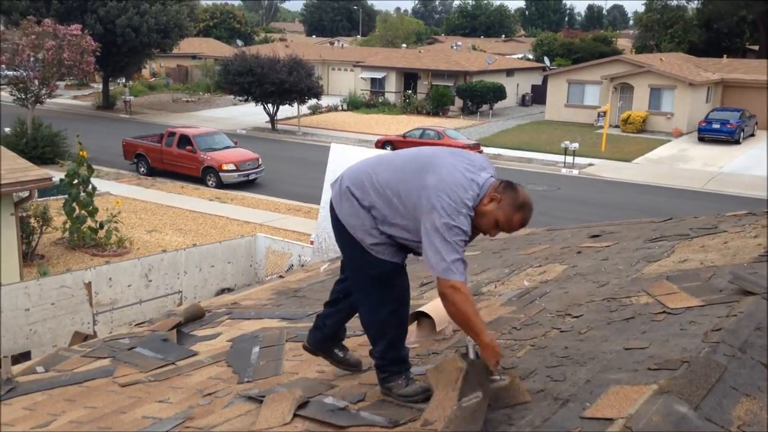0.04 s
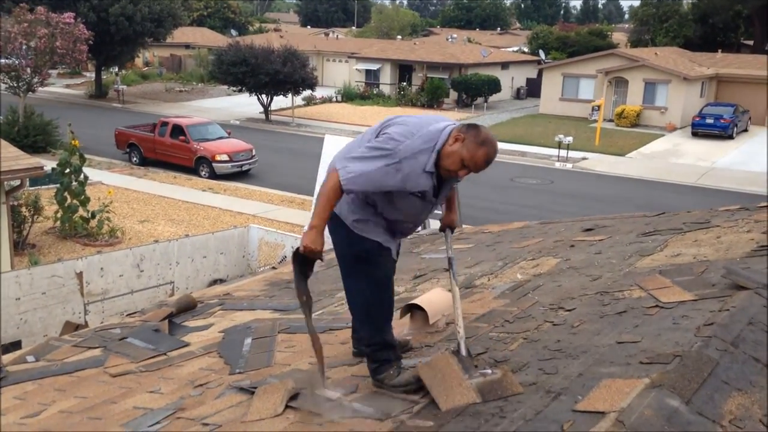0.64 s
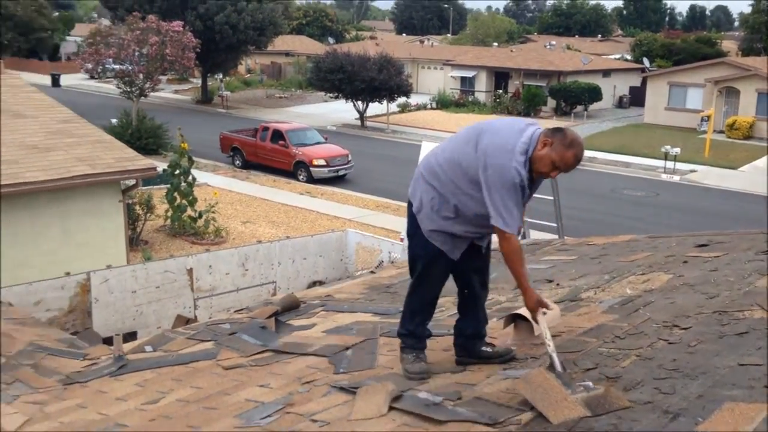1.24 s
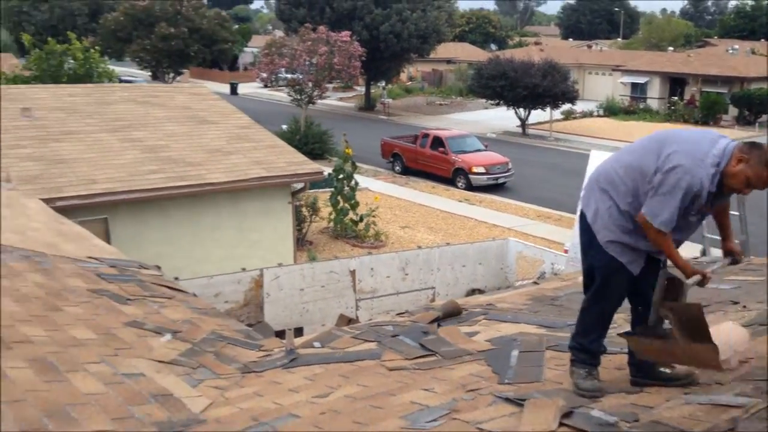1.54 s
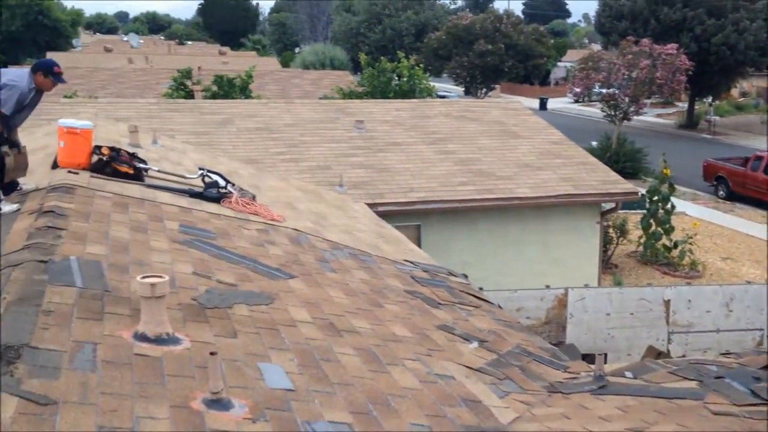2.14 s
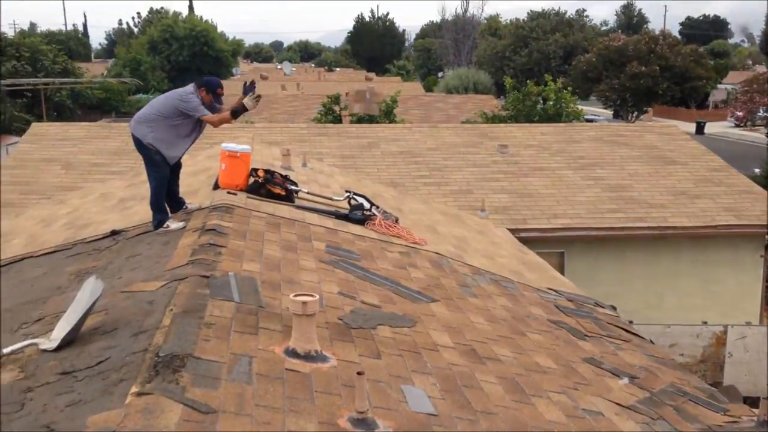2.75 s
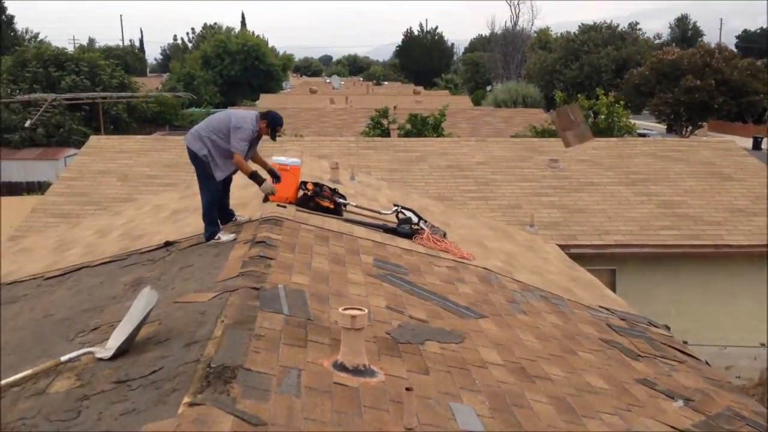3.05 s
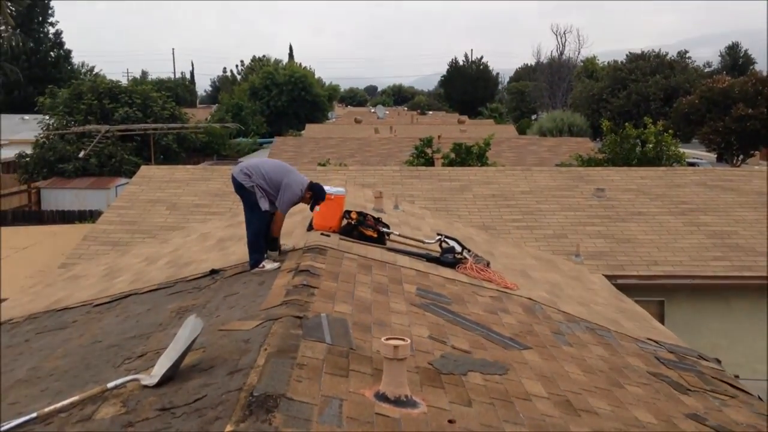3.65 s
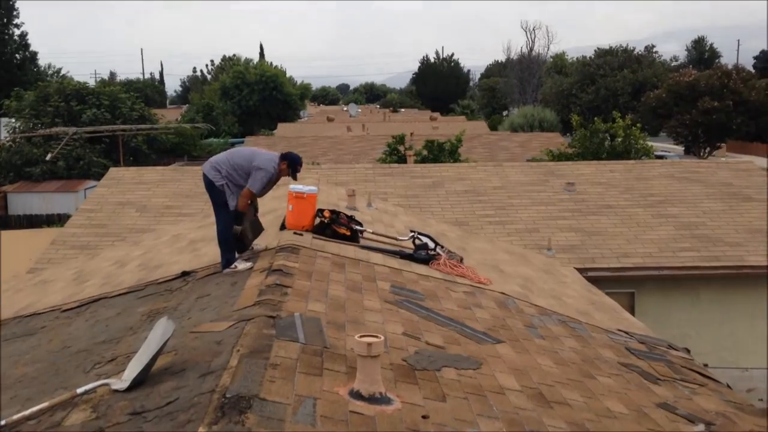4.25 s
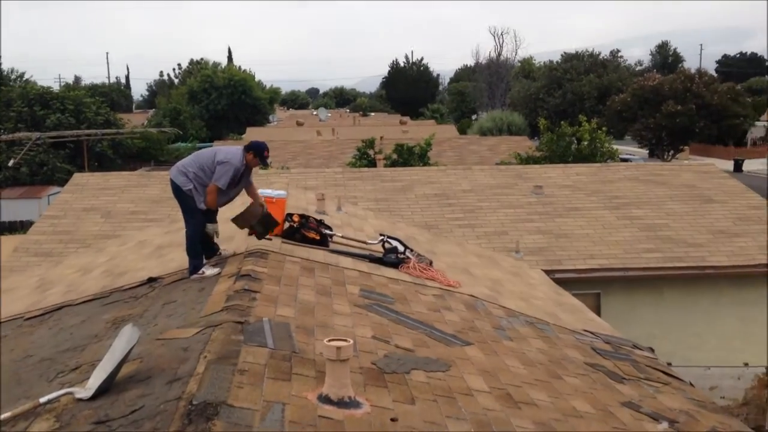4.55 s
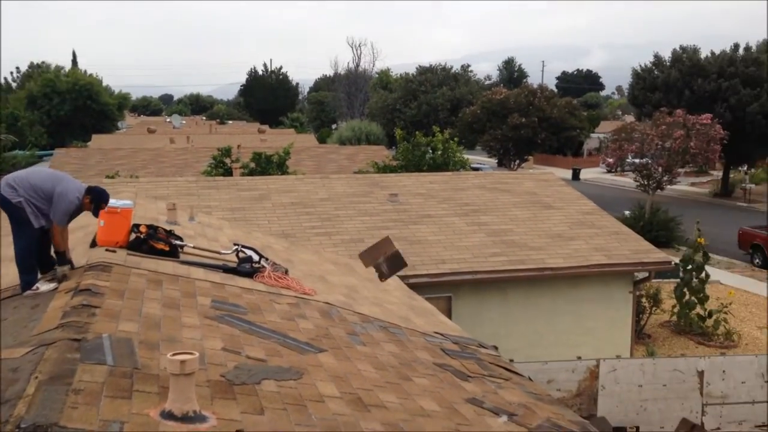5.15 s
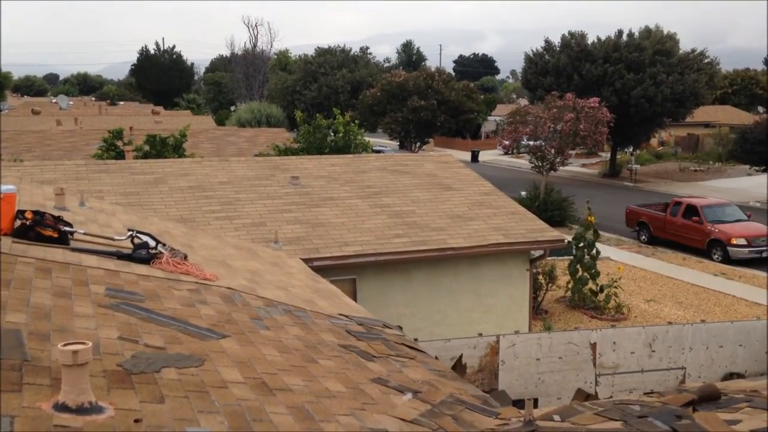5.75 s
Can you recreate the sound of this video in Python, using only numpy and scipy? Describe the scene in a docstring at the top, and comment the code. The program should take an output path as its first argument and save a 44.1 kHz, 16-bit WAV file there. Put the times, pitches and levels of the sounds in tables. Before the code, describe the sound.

Old asphalt shingles are torn off a plywood roof, heard close by outdoors over faint steady traffic and light wind. For the first 1.7 seconds, gritty rasps and hisses follow one another quickly, with slaps of stiff sheets, small cracks and dull footstep thumps; sharp steel ticks come near 0.5 seconds. In a short lull, one tiny, faint high whistle, perhaps a bird, sounds at about 1.9. A sharp tool knock and crack land at 2.1, followed by smaller snaps and a scrape with thuds around 2.8. The work turns quieter, with granules trickling, until a stronger drag and thump near 3.9. Light scrapes follow, then another pull and thud around 5. A loud knock with a crack and slap hits at 5.5, and at 5.7 a steel shovel crunches under the shingles with a brief metallic ring.

```python
"""On a plywood roof by a quiet street, roofers tear off old asphalt shingles. Gritty sheets rasp and
hiss by stick-slip friction, crack by brittle fracture and slap the boards. Steps and dropped pieces
thump the deck's modes, a tool knocks on the wood, and a steel shovel resonates as it scrapes.
Nearby walls reflect the work; behind it lie one thin whistle, far traffic and light wind."""
import sys
import numpy as np
from scipy import signal
from scipy.fft import rfft, irfft, next_fast_len
from scipy.io import wavfile
from scipy.ndimage import uniform_filter1d, map_coordinates

SR = 44100
rng = np.random.default_rng(int(sys.argv[2]) if len(sys.argv) > 2 else 0)


def transcribe(signal):
    """Save signal, clipped to [-1, 1], as a 16-bit WAV file at the path in sys.argv[1]."""
    frames = np.atleast_2d(signal).T
    limited = np.clip(frames, -1, 1)
    pcm = np.round(limited * 32767).astype(np.int16)
    wavfile.write(sys.argv[1], SR, pcm)


N = 255780

# Noise spectra. Each row: frequency in Hz, relative spectral density in dB.
FELT_SPECTRUM = [(100, -26.5), (170, -5.5), (300, -2), (520, -1.5), (750, -0.5), (1450, 0.5), (1850, -0.5),
                 (2200, -0.5), (2900, -5.5), (4000, -5), (8000, -43), (16000, -63)]  # rasping felt
GRIT_SPECTRUM = [(1200, -20), (2600, -8), (3800, 0), (6600, 0.5), (9000, -2.5), (13000, -5.5), (16000, -9)]  # hissing mineral granules
RUMBLE_SPECTRUM = [(20, -39), (36, -10), (50, 1), (90, 1), (170, -4.5), (270, -9), (450, -14),
                   (1200, -56.5)]  # the bass of deck and wind


def pull_levels():
    """Friction follows motion: each pull swells, holds, stops and leaves loose pieces trickling."""
    # Pulls on a shingle. Each row: start, length and rise in seconds, then rasp, grit and deck in dB.
    pulls = [(0.0, 0.24, 0.095, -32.5, -27.5, -35.5), (0.203, 0.081, 0.012, -28.5, -28.5, -34),
             (0.382, 0.22, 0.07, -39, -42, -47.5), (.556, 0.062, .005, -34, -31.5, -49),
             (0.714, 0.19, 0.13, -39, -37, -42.5), (0.955, 0.073, 0.0065, -42.5, -39.5, -43),
             (1.036, .13, .006, -36, -30.5, -43), (1.162, 0.2, 0.068, -31.5, -24.5, -36.5),
             (1.377, 0.14, .005, -32.5, -31, -39), (1.516, .07, 0.041, -28, -29.5, -40),
             (1.653, 0.23, 0.013, -48.5, -50, -53), (1.929, 0.15, 0.067, -44, -47.5, -51),
             (2.147, 0.092, 0.033, -42.5, -39, -56), (2.261, 0.014, 0.0023, -37.5, -34.5, -47),
             (2.313, 0.16, 0.0093, -44.5, -44, -50), (2.618, 0.091, 0.056, -34.5, -40, -42.5),
             (2.72, .083, 0.041, -31, -41.5, -30), (2.968, 0.033, 0.0073, -45, -40.5, -55),
             (3.032, 0.091, 0.079, -39.5, -43, -47), (3.39, .065, .03, -54, -63, -58),
             (3.506, 0.22, 0.086, -45.5, -46, -48), (3.795, 0.1, 0.031, -33, -37.5, -38.5),
             (3.901, 0.055, 0.021, -26.5, -37.5, -36.5), (4.027, 0.28, 0.032, -50, -52, -54),
             (4.215, 0.073, 0.031, -43, -54, -51), (4.544, 0.14, 0.038, -48.5, -55.5, -54),
             (4.718, 0.036, 0.021, -39.5, -38.5, -41), (4.797, 0.15, 0.011, -46.5, -44, -52),
             (4.921, 0.084, 0.0062, -35.5, -37, -41.5), (4.995, .13, 0.02, -34.5, -42.5, -32),
             (5.214, 0.32, 0.22, -43.5, -47.5, -44.5), (5.522, .07, 0.0064, -44, -49.5, -42),
             (5.696, 0.093, .006, -29.5, -30.5, -31.5)]
    rest_db, trickle_db = [-58.5, -69.5, -57.5], [-14.5, -14.5, -19]  # rasp, grit, deck
    swell_db, stop_db_per_s, trickle_db_per_s = 13.5, 377, 48
    t = np.arange(0, N, 32) / SR
    levels = np.outer(rest_db, np.ones(len(t)))  # litter stirs between pulls
    for start, length, rise, *layer_db in pulls:
        attack = swell_db * np.minimum((t - start) / rise - 1, 0)
        after = np.maximum(t - start - length, 0)
        trickle = np.add.outer(trickle_db, -trickle_db_per_s * after)
        release = np.maximum(-stop_db_per_s * after, trickle)
        levels = np.maximum(levels, np.add.outer(layer_db, attack) + release)
    return curves(np.column_stack([t, *levels]))


def shingle_drag(rasp_db, grit_db, deck_db):
    """Stick-slip friction: as sheets catch and slide, granules hiss, felt rasps and the deck rumbles."""
    slip_db = 1.6 * wobble(45) + 1.6 * wobble(220)  # shared by all parts of the contact
    rate = 5000 * amp(.55 * (grit_db + 34.5))  # a harder pull breaks more granules loose
    grit = moving_contact(grains(1.2 * rate, spread_db=3.5, smooth=0.68), depth_db=1.95)
    grit *= unit(amp(slip_db))
    rasp = moving_contact(grains(.4 * rate, spread_db=3, smooth=0.8), depth_db=2)
    rasp *= unit(amp(slip_db + 1.44 * wobble(90)))
    deck = grains(500, spread_db=4, smooth=0.61) * unit(amp(1.2 * slip_db))
    return (tint(grit * amp(grit_db - 0.1), GRIT_SPECTRUM)
            + tint(rasp * amp(rasp_db - 0.12), FELT_SPECTRUM)
            + tint(deck * amp(deck_db), RUMBLE_SPECTRUM))


def moving_contact(x, depth_db, size=512):
    """Spectral modulation: the colour wanders as different parts of a sheet touch the roof."""
    spectra = signal.stft(x, nperseg=size)[2]
    field = uniform_filter1d(rng.standard_normal(spectra.shape), size=5, axis=0)
    field = uniform_filter1d(field, size=7, axis=1)
    return unit(signal.istft(spectra * amp(depth_db * unit(field)), nperseg=size)[1][:N])


def cracks_and_scuffs():
    """Brittle fracture gives a spike with a crumbling tail; a scuff is a brief burst of friction."""
    # Shingles snap. Each row: time in seconds, body and treble levels in dB.
    cracks = [(.038, -41, -32), (.085, -37, -22.5), (0.5456, -27.5, -38), (0.5538, -18.5, -40),
              (0.9615, -40, -26), (2.113, -18.5, -19), (2.1205, -22, -28.5), (2.2828, -26.5, -23.5),
              (2.761, -26, -45), (2.795, -29, -44), (2.970, -42, -29.5), (5.5165, -18.5, -30)]
    # Jerks across the grit. Each row: start and length in seconds, body and treble levels in dB.
    scuffs = [(0.181, 0.0095, -30, -23), (.391, .003, -27.5, -36), (.675, 0.0091, -28.5, -38.5),
              (1.348, 0.021, -20.5, -26.5), (2.1008, .021, -22.5, -27), (3.154, 0.0056, -37, -40.5),
              (3.819, 0.012, -29, -32.5), (4.789, 0.0057, -36, -36), (5.463, 0.014, -26, -28)]
    # The body of a snap. Each row: frequency in Hz, relative spectral density in dB.
    body_spectrum = [(80, -19.5), (300, -1.5), (800, 1), (1500, 1.5), (2700, 0), (3800, -1.5), (5500, -11),
                     (7500, -37), (16000, -39)]
    strain_lead_s, strain_db = 0.0049, -13  # fibres give way just before a snap
    body, treble = np.zeros(N), np.zeros(N)
    t = np.arange(SR // 8) / SR
    crumble = amp(-60 * t / 0.011)
    for start, body_db, treble_db in cracks:
        weight = np.sqrt(0.0033 * SR)  # the energy of 3.3 ms at this level
        add(body, start, weight * amp(body_db) * burst(crumble, spike=0.57))
        add(treble, start, weight * amp(treble_db) * burst(crumble, spike=0.81))
        add(treble, start - strain_lead_s, weight * amp(treble_db + strain_db) * burst(crumble))
    for start, length, body_db, treble_db in scuffs:
        stroke = onset(t, 0.00033) * amp(-60 * np.maximum(t - length, 0) / 0.044)
        weight = np.sqrt(0.99 * length * SR)
        add(body, start, weight * amp(body_db) * burst(stroke))
        add(treble, start, weight * amp(treble_db) * burst(stroke))
    return tint(body, body_spectrum) + tint(treble, GRIT_SPECTRUM)


def shingle_slaps(rasp_db):
    """Heavy damping: tarry felt slaps with two short-lived bending modes and a rough edge."""
    # Stiff edges hit the boards. Each row: time in seconds, level in dB, pitch in Hz.
    hits = [(.105, -18, 595), (.2555, -12, 1020), (.635, -24, 1105), (1.574, -22, 1150),
            (2.263, -24.5, 1840), (2.282, -21.5, 590), (2.397, -33.5, 990), (2.588, -38, 1000),
            (2.642, -24, 824), (2.761, -18.5, 620), (4.725, -36, 1180), (5.121, -22.5, 510),
            (5.517, -12, 900)]
    slaps = np.zeros(N)
    t = np.arange(SR // 12) / SR
    for start, db, hz in hits + random_flaps(rasp_db):
        upper_hz = hz * rng.uniform(1.32, 1.8)
        bend = np.sin(2 * np.pi * hz * t) + 0.21 * np.sin(2 * np.pi * upper_hz * t)
        edge = 0.21 * amp(-60 * t / 0.0092) * rng.standard_normal(len(t))
        add(slaps, start, amp(db - 60 * t / 0.023) * (bend + edge) * onset(t, 0.00035))
    return slaps


def random_flaps(rasp_db, per_s=22, over_rasp_db=6, scatter_db=2, hz=900, scatter_octaves=0.532):
    """A Poisson process: sheet edges flap at random times, harder in a strong pull."""
    samples = np.flatnonzero(rng.random(N) < per_s / SR)
    scatter = rng.standard_normal((len(samples), 2))
    return [(i / SR, rasp_db[i] + over_rasp_db + scatter_db * a, hz * 2 ** (scatter_octaves * b))
            for i, (a, b) in zip(samples, scatter)]


def deck_thumps():
    """Plate vibration: the plywood swings briefly under each blow, then the deck's modes hum on."""
    # Steps and blows. Each row: time in seconds, relative level in dB, pitch in Hz, T60 in seconds.
    thumps = [(0.106, -22, 151, 0.028), (0.191, -18, 150, 0.023), (.303, -23.5, 172, 0.033),
              (.828, -33, 294, 0.045), (.862, -30.5, 218, 0.11), (1.277, -21, 273, 0.028),
              (1.345, -15.5, 132, 0.021), (1.385, -28, 58, .2), (1.71, -20.5, 255, 0.012),
              (1.737, -24, 280, 0.014), (2.11, -22.5, 96, 0.08), (2.7601, -15, 253, 0.017),
              (2.796, -18.5, 160, 0.045), (3.036, -41, 340, 0.07), (3.519, -33.5, 219, 0.032),
              (3.936, -9, 119, 0.023), (5.026, -19, 100, 0.06), (5.5178, -3.5, 306, .018),
              (5.7, -26.5, 186, .2)]
    # Modes of plywood on rafters. Each row: frequency and bandwidth in Hz, relative gain in dB.
    deck_modes = [(75, 25, -16), (180, 18, -4.5), (279, 7.3, 1.5), (310, 12, -11), (423, 16, -3),
                  (540, 17, 1), (630, 30, 8), (754, 50, 14)]
    blows = np.zeros(N)
    t = np.arange(SR // 3) / SR
    for start, db, hz, t60 in thumps:
        add(blows, start, amp(db + 2 - 60 * t / t60) * np.sin(2 * np.pi * hz * t) * onset(t, 0.00065))
    return blows + amp(-6) * resonate(blows, deck_modes)


def tool_taps():
    """Hard impact: a short contact gives a bright tick of a few cycles."""
    # Steel strikes nails and boards. Each row: time in seconds, relative level in dB, pitch in Hz.
    strikes = [(0.393, -9, 3400), (0.546, -7, 4230), (.554, -4, 4180), (2.113, 4, 2760),
               (2.2833, -13, 3800), (4.931, -29, 4000), (5.5168, -4, 4400)]
    taps = np.zeros(N)
    t = np.arange(SR // 50) / SR
    for start, db, hz in strikes:
        add(taps, start, amp(db - 2 - 60 * t / 0.0035) * np.sin(2 * np.pi * hz * t) * onset(t, 0.00023))
    return taps


def shovel(grit_db):
    """Forced resonance: granules rub the steel blade into ringing; a stab crunches and rings it hard."""
    # Modes of the blade. Each row: frequency and bandwidth in Hz, gain in dB.
    blade_modes = [(2140, 81, -5), (3700, 40, -2), (4350, 410, -3), (4405, 14, -10), (5600, 36, -2.5),
                   (6420, 40, -15), (7600, 26, 2), (8100, 90, -3), (8960, 40, -5)]
    # Thrusts under the shingles. Each row: start in seconds, relative level in dB, T60 in seconds.
    stabs = [(5.6985, -22.5, 0.073), (5.712, -26.5, 0.1), (5.754, -25.5, 0.15)]
    rub_db, rub_until_s = -5.5, 2.9  # while the near roofer drags sheets past the blade
    near = np.arange(N) / SR < rub_until_s
    rubbing = near * amp(grit_db + rub_db) * grains(2500, spread_db=3, smooth=.5)
    force = np.zeros(N)
    t = np.arange(SR // 4) / SR
    for start, db, t60 in stabs:
        add(force, start, amp(db - 60 * t / t60) * onset(t, 0.00071))
    crunch = force * grains(12000, spread_db=4.5, smooth=0.97)
    ring = resonate(rubbing + amp(20.5) * crunch, blade_modes)
    return ring + amp(-4.5) * tint(crunch, GRIT_SPECTRUM) + amp(1) * tint(crunch, FELT_SPECTRUM)


def stray_granules():
    """Sparse impacts: single granules tick down the slope all through the work."""
    return amp(-68) * tint(grains(rate=22, spread_db=1, smooth=0), GRIT_SPECTRUM)


def distance_shelf(x, corner_hz=9700):
    """Treble loss with distance: the top octave is stronger for near work, weaker for far work."""
    # The top octave. Each row: time in seconds, gain in dB.
    top_gains = [(0, -3), (.4, 2), (.62, 3), (1.1, 2.5), (2.1, 1), (3.8, -7.5), (4.15, -4.5), (5.8, -1)]
    top_db, = curves(top_gains)
    top = signal.sosfiltfilt(signal.butter(2, corner_hz, "highpass", fs=SR, output="sos"), x)
    return x + (amp(top_db) - 1) * top


def whistle():
    """A frequency glide: one faint pure note, perhaps a bird, sinks a little as it fades."""
    # The note. Each row: start and length in seconds, starting pitch in Hz, peak level in dB.
    notes = [(1.864, 0.076, 4300, -51)]
    sound = np.zeros(N)
    for start, length, hz, db in notes:
        progress = np.arange(round(length * SR)) / (length * SR)
        phase = 2 * np.pi * np.cumsum(hz * (1 - .028 * progress)) / SR
        add(sound, start, amp(db) * np.sin(np.pi * np.sqrt(progress)) * np.sin(phase))
    return sound


def wall_echo(x):
    """Reverberation: neighbouring walls return a diffuse tail whose treble dies first."""
    # Decay of the echo. Each row: frequency in Hz, T60 in seconds.
    decay_times = [(100, 0.34), (1500, 0.14), (12000, 0.14)]
    hz, t, spectra = signal.stft(rng.standard_normal(SR // 2), SR, nperseg=256)
    decay = amp(-60 * t / along(decay_times, hz)[:, None])
    tail = signal.istft(spectra * decay, SR, nperseg=256)[1]
    return signal.fftconvolve(x, tail / np.linalg.norm(tail))[:N]


def street():
    """Amplitude-modulated noise: far traffic barely wavers while light wind comes and goes in the bass."""
    # Far traffic. Each row: frequency in Hz, relative spectral density in dB.
    traffic_spectrum = [(18, -30), (32, -5), (55, -2), (105, -2), (160, -10), (350, -19.5), (740, -21),
                        (1300, -15.5), (2050, -13), (3500, -20.5), (6000, -29), (16000, -35)]
    traffic = amp(-53 + .8 * wobble(2.06)) * tint(rng.standard_normal(N), traffic_spectrum)
    wind = amp(-64.5 + 4.4 * wobble(12)) * tint(rng.standard_normal(N), RUMBLE_SPECTRUM)
    return traffic + wind


def grains(rate, spread_db, smooth):
    """Shot noise: rate tiny uneven impacts a second, over a share of smooth rubbing noise."""
    sizes = amp(spread_db * np.clip(rng.standard_normal(N), -2, 2)) * rng.choice([-1, 1], N)
    hits = (rng.random(N) < rate / SR) * sizes / np.sqrt(rate)
    return unit(unit(hits) + smooth * rng.standard_normal(N))


def burst(envelope, spike=0):
    """A transient of unit energy: enveloped noise with an optional leading impulse."""
    noise = unit(envelope * rng.standard_normal(len(envelope))) / np.sqrt(len(envelope))
    noise[0] += spike
    return noise / np.linalg.norm(noise)


def resonate(x, modes):
    """Modal superposition: x drives second-order resonators in parallel."""
    size = next_fast_len(N + SR)
    f = np.fft.rfftfreq(size, 1 / SR)
    response = sum(amp(db) * 1j * f * width / (hz * hz - f * f + 1j * f * width)
                   for hz, width, db in modes)
    return irfft(rfft(x, size) * response, size)[:N]


def tint(x, spectrum, size=8192):
    """Minimum-phase filtering: a causal colouring that keeps the power of white noise."""
    gain = unit(amp(along(spectrum, np.fft.rfftfreq(size, 1 / SR))))
    cepstrum = irfft(np.log(gain + 1e-6))
    cepstrum[1:size // 2] *= 2
    cepstrum[size // 2 + 1:] = 0
    return signal.fftconvolve(x, irfft(np.exp(rfft(cepstrum))))[:N]


def onset(t, tau_s):
    """First-order rise from 0 to 1."""
    return 1 - np.exp(-t / tau_s)


def amp(db):
    """Decibels to amplitude ratio."""
    return 10 ** (np.asarray(db) / 20)


def unit(x):
    """Normalisation to rms 1."""
    return x / np.sqrt(np.mean(x ** 2) + 1e-20)


def along(points, hz):
    """Interpolation on a log-frequency axis."""
    knots_hz, values = np.transpose(points)
    return np.interp(np.log(hz + 1), np.log(knots_hz + 1), values)


def curves(rows):
    """Linear interpolation: one value per sample for each column after the time."""
    times, *columns = np.transpose(rows)
    return [np.interp(np.arange(N) / SR, times, column) for column in columns]


def wobble(rate):
    """Smooth random modulation with rate knots a second."""
    return map_coordinates(rng.standard_normal(int(N * rate / SR) + 4), [np.arange(N) * rate / SR])


def add(track, start, sound):
    """Superposition: mix a sound into the track from start seconds on."""
    part = track[max(round(start * SR), 0):][:len(sound)]
    part += sound[:len(part)]


def scene():
    """Work, echo and street superpose; the same pulls drive the dragging, the flapping and the blade."""
    rasp_db, grit_db, deck_db = pull_levels()
    sliding = shingle_drag(rasp_db, grit_db, deck_db) + shovel(grit_db) + stray_granules()
    impacts = cracks_and_scuffs() + tool_taps() + deck_thumps() + shingle_slaps(rasp_db)
    direct = distance_shelf(sliding + impacts) + whistle()
    return (direct + amp(-12.5) * wall_echo(direct) + street())[None]


def record(dry):
    """Band limiting: the deepest bass is thinned and treble above 15.5 kHz is cut off."""
    low_hz, top_hz = 38, 15500
    size = next_fast_len(N + SR // 2)
    hz = np.fft.rfftfreq(size, 1 / SR)
    thinned = signal.sosfilt(signal.butter(3, low_hz, "highpass", fs=SR, output="sos"), dry)
    return irfft(rfft(thinned, size) * (hz < top_hz), size)[:, :N]


dry = scene()
out = record(dry)
transcribe(out)
```